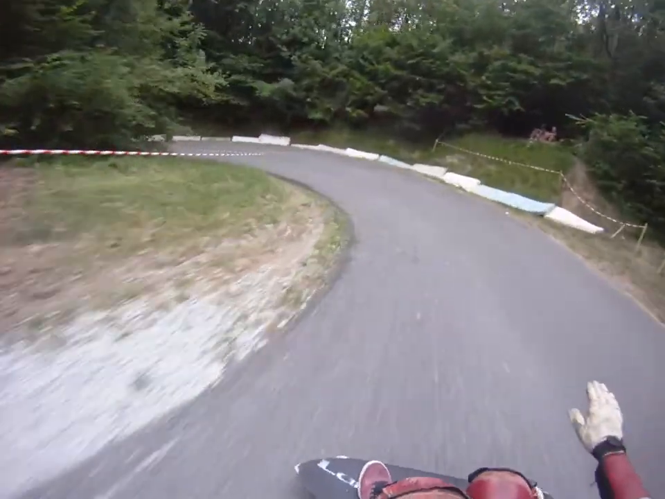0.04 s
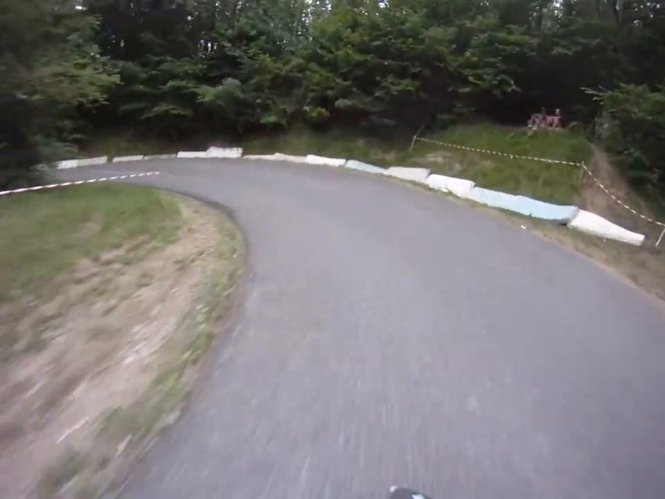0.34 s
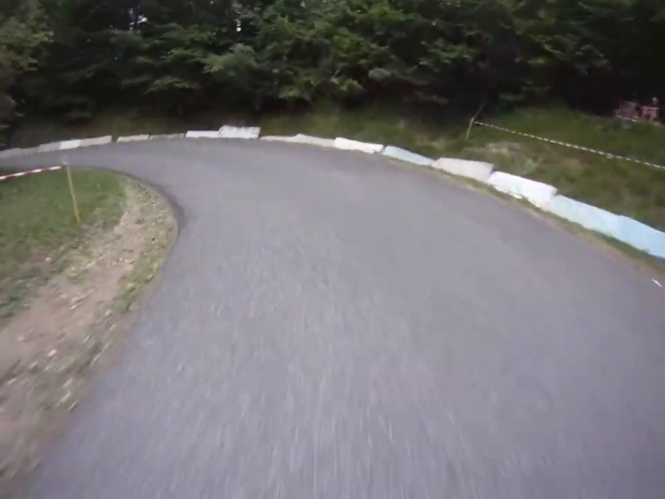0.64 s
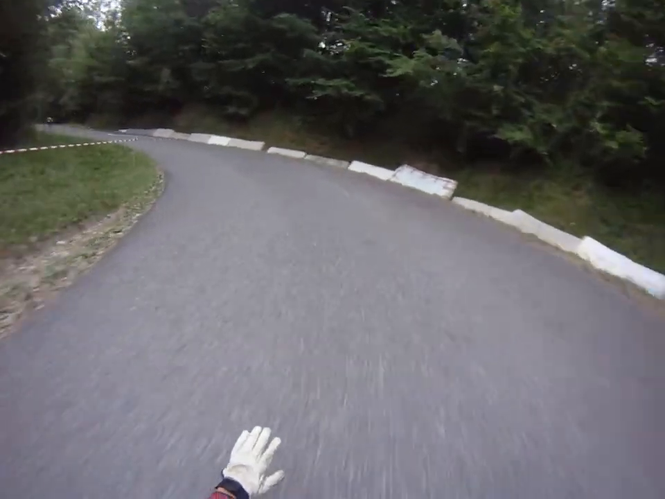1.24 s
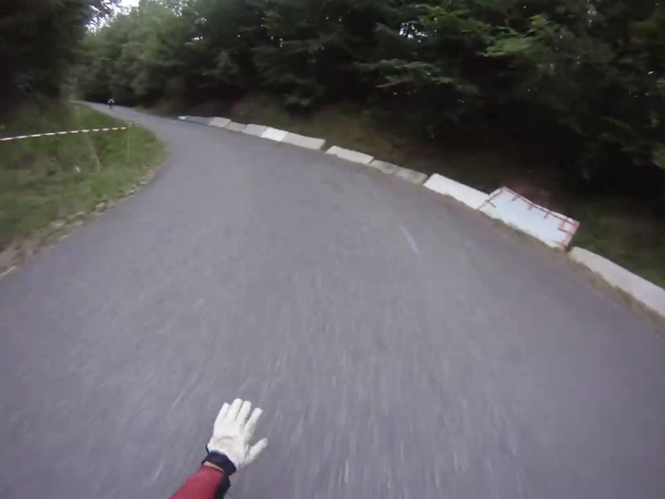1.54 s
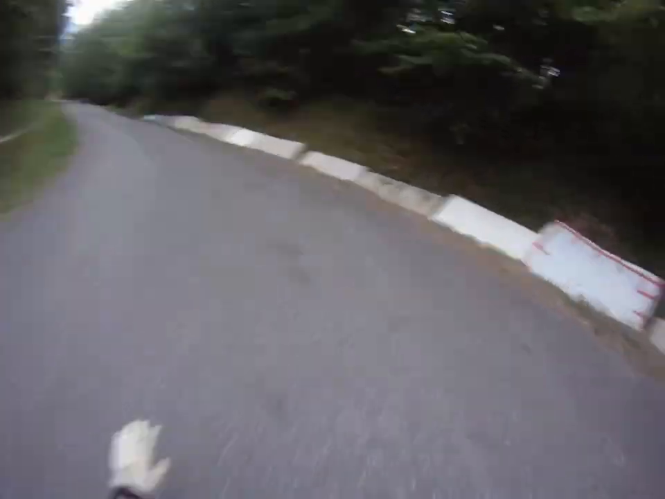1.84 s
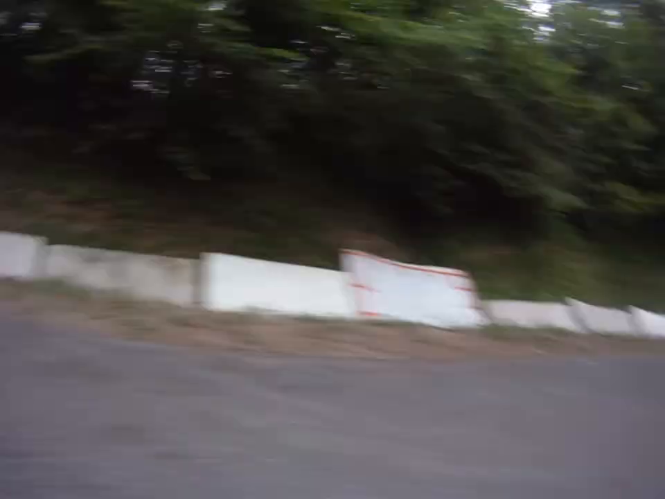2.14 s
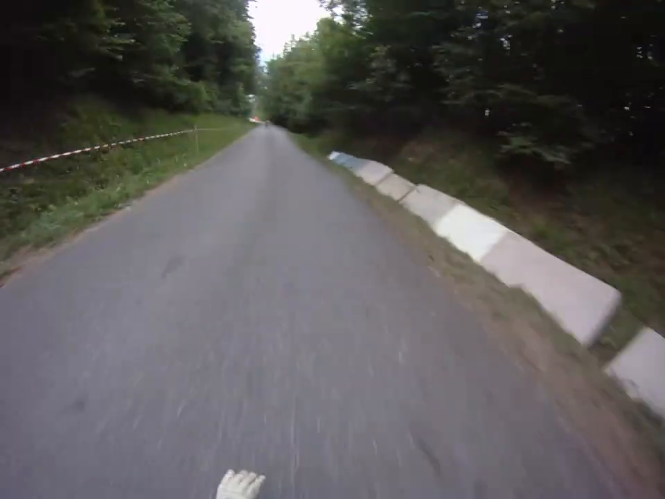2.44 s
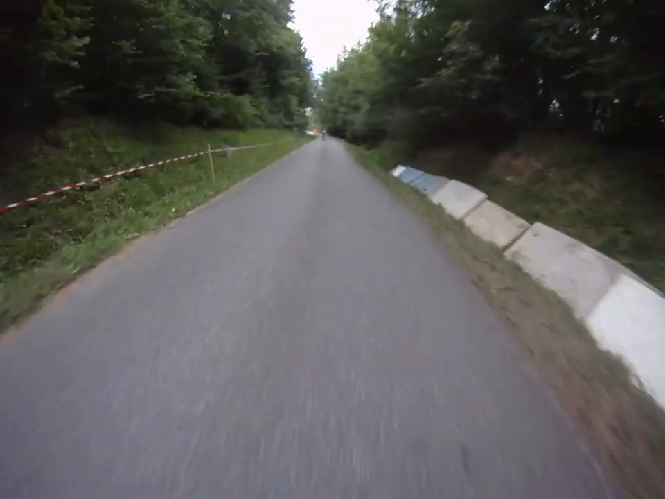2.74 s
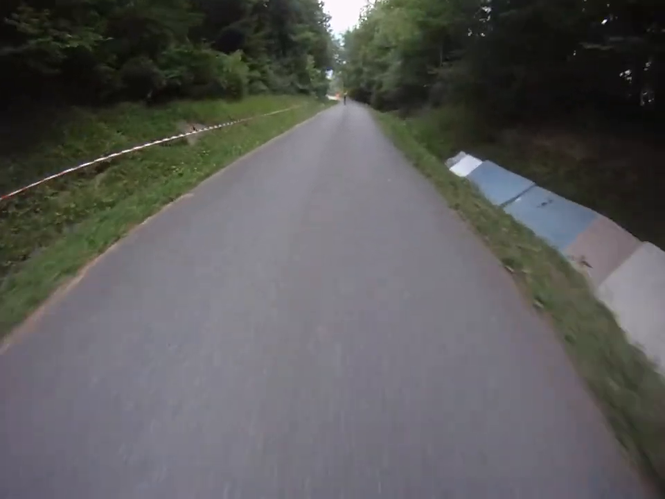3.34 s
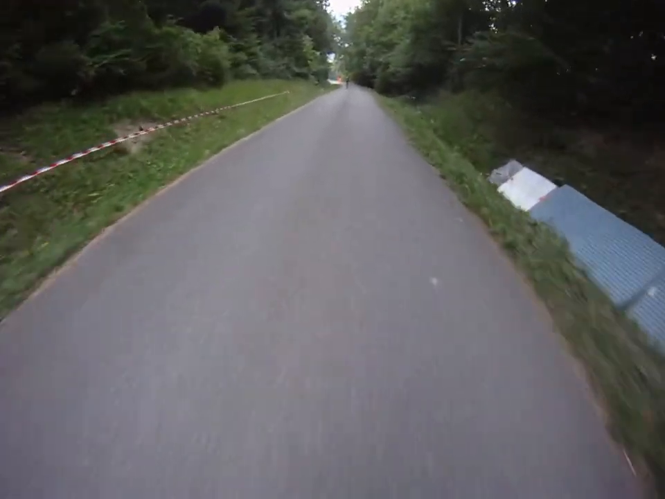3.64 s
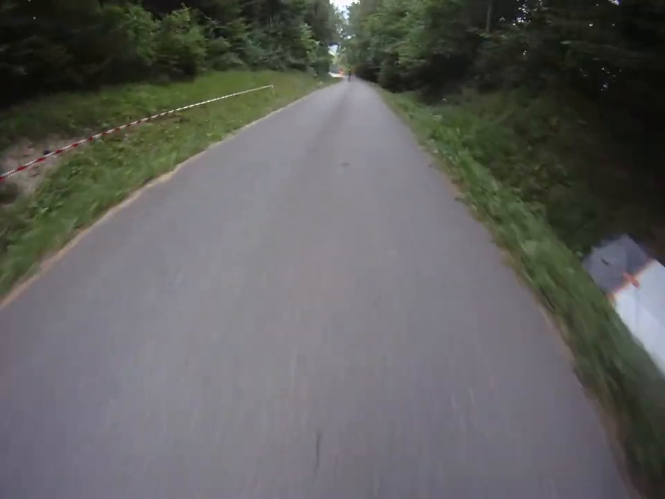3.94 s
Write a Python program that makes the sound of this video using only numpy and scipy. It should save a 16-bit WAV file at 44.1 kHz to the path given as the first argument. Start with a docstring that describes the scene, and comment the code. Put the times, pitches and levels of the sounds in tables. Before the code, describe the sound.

Skateboard wheels skid sideways on asphalt, grip and hum onward, with wind buffeting the microphone.

```python
"""A bend on coarse asphalt, heard close from a camera microphone on a drifting longboard rider.
Road texture sets the wheels humming and the deck ringing, and loose grit cracks under them.
Pushed sideways, the wheels scrape and squeal in stick-slip bursts, chirp as they grip and roll on.
Wind rumbles and thumps on the microphone; the loud thumps duck the limiter.
The camera's low sample rate adds a glassy fizz."""
import sys
import numpy as np
from scipy import signal
from scipy.fft import rfft, irfft
from scipy.io import wavfile
from scipy.ndimage import uniform_filter1d

SR = 44100
rng = np.random.default_rng(int(sys.argv[2]) if len(sys.argv) > 2 else 0)


def pcm_store(signal):
    """Save signal as 16-bit PCM."""
    levels = np.round(np.clip(np.atleast_2d(signal), -1, 1) * 32767)
    wavfile.write(sys.argv[1], SR, levels.astype(np.int16).T)


N = 176400
T = np.arange(N) / SR

# wind rumble on the microphone: t/s, level/dB
WIND_LEVEL = [(0, -22.5), (.12, -12), (.35, -18.5), (.5, -22), (.83, -19), (1.0, -23), (1.75, -23.5),
              (1.9, -16), (2.3, -21), (2.6, -16), (2.8, -15), (3.3, -18.5), (3.6, -17), (4, -17)]
# rumble spectrum: f/Hz, relative level/dB
WIND_SPECTRUM = [(12, 0.5), (30, -1), (60, -0.5), (95, -0.5), (150, -6), (250, -9.5), (450, -21),
                 (900, -37.5), (2000, -40), (6000, -70)]
# gusts as the rider swings round: t/s, peak/dB, rise/s, fall/s
GUSTS = [(2.103, -9.5, 0.022, 0.0069), (2.27, -15.5, 0.12, 0.033), (2.331, -14, 0.036, .007)]
# spectrum of the rushing air: f/Hz, relative level/dB
RUSH_SPECTRUM = [(60, -10), (170, 2.5), (350, 5), (750, -4), (1100, -17.5), (2000, -27), (3500, -29.5),
                 (5500, -62)]
# thumps of air on the microphone: t/s, peak/dB, half width/s
THUMPS = [(0.132, -0.5, .004), (.862, -6.5, 0.0035), (2.5, -1, 0.0014), (2.665, 5, 0.0041),
          (2.896, 6, 0.0015), (3.45, 6, 0.0012), (3.677, 5, 0.0016), (3.731, 3, 0.0034),
          (3.76, -0.5, 0.0027)]
# road noise under the wheels: t/s, level/dB
ROAD_LEVEL = [(0, -35.5), (.5, -25), (.85, -31), (1.1, -31.5), (1.7, -27.5), (1.9, -34.5), (2.6, -34.5),
              (2.85, -32), (3.15, -31), (3.6, -38), (4, -36.5)]
# road noise spectrum: f/Hz, relative level/dB
ROAD_SPECTRUM = [(150, -0.5), (300, 6), (600, 3), (1000, -0.5), (1400, -6), (2000, -11), (2900, -4),
                 (3700, -13), (4700, -16), (5600, -22.5)]
# snaps of grit: t/s, level/dB, f/Hz, decay/s
GRIT_SNAPS = [(0.426, -22.5, 3500, 0.0017), (.652, -11.5, 1250, 0.0045), (.791, -7.5, 2810, 0.0012),
              (2.873, -24, 4600, 0.0023), (2.953, -35, 4700, .002), (2.979, -37, 4700, .002),
              (3.053, -32.5, 4640, 0.0031)]
# the deck's upper ring: t/s, level/dB
DECK_LEVEL = [(0, -36), (.33, -37), (.42, -26), (.85, -30), (1.1, -30), (1.7, -30.5), (2.5, -34), (4, -39)]
# wheel hum: t/s, level/dB
HUM_LEVEL = [(0, -26), (.33, -25.5), (.43, -14.5), (.6, -18.5), (.9, -18), (1.05, -15.5), (1.55, -16),
             (1.76, -14.5), (1.88, -16.5), (2.3, -21), (2.45, -22), (2.8, -21.5), (3.3, -20.5), (3.6, -24),
             (4, -22)]
# centre of the wheel resonance: t/s, f/Hz
HUM_PITCH = [(0, 472), (.45, 420), (.62, 473), (.95, 457), (1.05, 514), (1.75, 495.5), (2.1, 485),
             (2.6, 458), (4, 464)]
# colour around that resonance: f/Hz, relative gain/dB
HUM_COLOUR = [(100, -0.5), (300, 5), (600, 2), (900, -3), (1500, 9), (6000, -18)]
# sideways slide: t/s, scrape level/dB, squeal level/dB
SLIDE_LEVELS = [(0, -36, -29.5), (.06, -30, -24.5), (.24, -33.5, -24.5), (.32, -33.5, -53), (.42, -65, -38),
                (.505, -49, -41), (.535, -33.5, -27.5), (.6, -24.5, -20.5), (.78, -21, -21.5),
                (.85, -21, -24), (.885, -28, -33), (.95, -21, -29), (1.02, -23, -24.5), (1.15, -24, -29),
                (1.3, -20.5, -34), (1.45, -28.5, -31), (1.51, -23.5, -28), (1.56, -29.5, -33),
                (1.68, -27.5, -31.5), (1.75, -56, -54), (1.84, -65, -65)]
# scrape spectrum: f/Hz, relative level/dB
SCRAPE_SPECTRUM = [(300, 2.5), (750, 10.5), (950, -5.5), (1250, 5), (1650, -5.5), (2250, 7.5), (2800, 6),
                   (3250, -1.5), (3750, -7), (4700, 2.5), (5300, -3.5), (5900, -19.5)]
# wheel edges digging in: t/s, peak/dB, half length/s
DIGS = [(1.024, -22.5, 0.024), (1.292, -24.5, 0.034), (1.506, -21, 0.019)]
# chirps as the wheels grip: t/s, peak/dB, half length/s, f/Hz
CHIRPS = [(1.735, -28.5, 0.04, 2920), (2.401, -29.5, 0.035, 3070)]

WIND_LUMP_DB, ROAD_ROUGH_DB = 2.5, 0.96
THUMP_RUSH_DB, THUMP_RUSH_S, THUMP_LEAD_S = -20.5, 0.0017, 0.0019
HUM_WANDER_HZ, HUM_ROUGH_DB, HUM_SWELL_DB = 22.7, 1.0, 1.36
THROBS_PER_S, THROB_JITTER, THROB_DB = 76, 0.1552, 1.74
SLIPS_PER_S, SLIP_JITTER, SLIP_DB = 140, 0.3304, 4.5
GRAINS_PER_S, GRAIN_SPREAD_DB, SCRAPE_FLUTTER_DB = 5000, 4, 2.5
ECHO_S, ECHO_SWAY, ECHO_DB = 0.0032, 0.074, -10
SQUEAL_FLUTTER_DB, CHIRP_RISE_HZ_PER_S = 3.4, 1200
LIMIT_DB, LIMIT_SENSE_S, LIMIT_ATTACK_S, RELEASE_DB_PER_S = -5, 0.0005, 0.0017, 73.5
CAMERA_RATE_HZ, BAND_EDGE_HZ, TOP_CUT_HZ = 12000, 5750, 15250


def from_db(db):
    """Decibels to gain."""
    return 10 ** (np.asarray(db) / 20)


def unit_rms(x):
    """Scale to rms 1."""
    return x / np.sqrt(np.mean(x ** 2) + 1e-20)


def curve(rows, column=1):
    """One column of a time table at every sample."""
    rows = np.array(rows)
    return np.interp(T, rows[:, 0], rows[:, column])


def noise():
    """White noise."""
    return rng.standard_normal(N)


def drift(hz):
    """A random wander of rms 1, mostly slower than hz."""
    pole = np.exp(-2 * np.pi * hz * 20 / SR)  # one step per 20 samples
    steps = rng.standard_normal(N // 20 + 2002)
    slow = signal.lfilter([1], [1, -2 * pole, pole * pole], steps)[2000:]
    return np.interp(np.arange(N) / 20, np.arange(len(slow)), unit_rms(slow))


def colour(x, spectrum):
    """Shape a sound with a spectrum table; rms 1."""
    hz, db = np.transpose(spectrum)
    bins_hz = np.maximum(np.arange(N // 2 + 1) * SR / N, 1)
    gain = from_db(np.interp(np.log(bins_hz), np.log(hz), db))
    return unit_rms(irfft(rfft(x) * gain, N))


def resonate(x, hz, width_hz):
    """A steep-sided resonance whose centre may move; rms 1."""
    carrier = np.exp(2j * np.pi * np.cumsum(hz * np.ones(N)) / SR)
    pole = np.exp(-np.pi * width_hz / SR)
    baseband = signal.lfilter([1], [1, -2 * pole, pole * pole], x / carrier)
    return unit_rms((baseband * carrier).real)


def steady(x, span_s):
    """Even out swells longer than the span."""
    return x / np.sqrt(uniform_filter1d(x * x, max(int(span_s * SR), 2)) + 1e-9)


def swell(at_s, rise_s, fall_s):
    """A bell-shaped envelope of height 1."""
    return np.exp(-((T - at_s) / np.where(T < at_s, rise_s, fall_s)) ** 2)


def pulsing(per_s, jitter, depth_db):
    """A gain that swings up and down at an unsteady rate."""
    phase = 2 * np.pi * np.cumsum(per_s * (1 + jitter)) / SR
    return from_db(depth_db * np.cos(phase))


def wind():
    """Air right on the microphone: lumpy rumble, brighter gusts, pressure thumps led by a short rush."""
    rumble = steady(colour(noise(), WIND_SPECTRUM), span_s=0.096)
    lumps = unit_rms(from_db(WIND_LUMP_DB * drift(13)))
    rush = steady(colour(noise(), RUSH_SPECTRUM), span_s=0.01)
    air = rumble * lumps * from_db(curve(WIND_LEVEL))
    for at_s, db, rise_s, fall_s in GUSTS:
        air += from_db(db) * swell(at_s, rise_s, fall_s) * rush
    for at_s, db, half_s in THUMPS:
        lead = from_db(THUMP_RUSH_DB) * swell(at_s - THUMP_LEAD_S, THUMP_RUSH_S, THUMP_RUSH_S) * rush
        air += from_db(db) * (swell(at_s, half_s, half_s) + lead)
    return air


def road_noise():
    """Coarse asphalt lays a broad, rough noise under the rolling wheels."""
    texture = noise() * from_db(ROAD_ROUGH_DB * drift(99))
    return colour(texture, ROAD_SPECTRUM) * from_db(curve(ROAD_LEVEL))


def grit():
    """Loose stones crack under a wheel."""
    snaps = np.zeros(N)
    for at_s, db, hz, decay_s in GRIT_SNAPS:
        ring = steady(resonate(noise(), hz, width_hz=1600), span_s=0.0017)
        decay = (T >= at_s) * np.exp(-np.abs(T - at_s) / decay_s)
        snaps += from_db(db) * ring * decay
    return snaps


def deck_ring():
    """The road rings the deck underfoot, most as the board is pushed sideways."""
    return resonate(noise(), hz=714, width_hz=164) * from_db(curve(DECK_LEVEL))


def wheel_hum():
    """Road texture drives a wheel resonance that shifts with load and throbs."""
    texture = noise() * from_db(HUM_ROUGH_DB * drift(38))
    ring = resonate(texture, curve(HUM_PITCH) + HUM_WANDER_HZ * drift(21), width_hz=120)
    hum = steady(colour(ring, HUM_COLOUR), span_s=0.034)
    throb = pulsing(THROBS_PER_S, THROB_JITTER * drift(7.95), THROB_DB)
    swells = from_db(HUM_SWELL_DB * drift(26))
    return unit_rms(hum * throb * swells) * from_db(curve(HUM_LEVEL))


def scrape(slips):
    """Stones tear at the skidding wheels; the microphone also hears it bounce off the crouching rider."""
    sizes = from_db(GRAIN_SPREAD_DB * np.minimum(rng.exponential(1, N), 4))
    grains = sizes * rng.choice([-1, 1], N) * (rng.random(N) < GRAINS_PER_S / SR)
    flutter = from_db(SCRAPE_FLUTTER_DB * drift(26))
    direct = colour(grains * np.sqrt(slips) * flutter, SCRAPE_SPECTRUM)
    delay_s = ECHO_S * (1 + ECHO_SWAY * drift(0.5))
    echo = from_db(ECHO_DB) * np.interp(T - delay_s, T, direct)
    return unit_rms(direct + echo) * from_db(curve(SLIDE_LEVELS))


def squeal(slips, hz, width_hz):
    """The rubbery ring of a wheel, surging at every slip; rms 1."""
    ring = steady(resonate(noise(), hz, width_hz), span_s=0.0051)
    flutter = from_db(SQUEAL_FLUTTER_DB * drift(33))
    return unit_rms(ring * slips * flutter)


def grip_chirps(slips):
    """The wheels give a short rising squeal as they grip."""
    chirps = np.zeros(N)
    for at_s, db, half_s, hz in CHIRPS:
        glide_hz = CHIRP_RISE_HZ_PER_S * np.clip(T - at_s, -2 * half_s, 2 * half_s)
        chirps += from_db(db) * swell(at_s, half_s, half_s) * squeal(slips, hz + glide_hz, width_hz=440)
    return chirps


def edge_digs(slips):
    """The wheel edges dig in with a lower rasp."""
    bursts = sum(from_db(db) * swell(at_s, half_s, half_s) for at_s, db, half_s in DIGS)
    return squeal(slips, hz=2250, width_hz=1500) * bursts


def slide():
    """Close below the microphone the wheels stick and slip; that one pulse drives all the skid sounds."""
    slips = pulsing(SLIPS_PER_S, SLIP_JITTER * drift(59.8), SLIP_DB)
    skid = scrape(slips) + grip_chirps(slips) + edge_digs(slips)
    return skid + squeal(slips, hz=2985, width_hz=405) * from_db(curve(SLIDE_LEVELS, column=2))


def scene():
    """One microphone rides with the board and feeds both channels."""
    mono = wheel_hum() + deck_ring() + road_noise() + slide() + grit() + wind()
    return np.tile(mono, (2, 1))


def limiter(x):
    """Loud swings pull the gain down quickly; it creeps back."""
    power = uniform_filter1d((x * x).mean(axis=0), int(LIMIT_SENSE_S * SR))
    over_db = np.maximum(10 * np.log10(np.abs(power) + 1e-9) - LIMIT_DB, 0)
    held_db = np.maximum.accumulate(over_db + RELEASE_DB_PER_S * T) - RELEASE_DB_PER_S * T
    pole = np.exp(-1 / (LIMIT_ATTACK_S * SR))
    return x * from_db(-signal.lfilter([1 - pole], [1, -pole], held_db))


def record(dry):
    """The camera: limiter, bass cut, a low sample rate and a top cut."""
    x = signal.sosfilt(signal.butter(1, 18, "high", fs=SR, output="sos"), limiter(dry))
    x = signal.sosfilt(signal.butter(14, BAND_EDGE_HZ, fs=SR, output="sos"), x)
    coarse = np.clip(signal.resample(x, N * CAMERA_RATE_HZ // SR, axis=1), -1, 1)
    # held steps mirror the sound into the treble as fizz
    stepped = signal.resample(np.repeat(coarse, 4, axis=1), N, axis=1)
    return signal.sosfilt(signal.ellip(12, 0.1, 90, TOP_CUT_HZ, fs=SR, output="sos"), stepped)


dry = scene()
out = record(dry)
pcm_store(out)
```